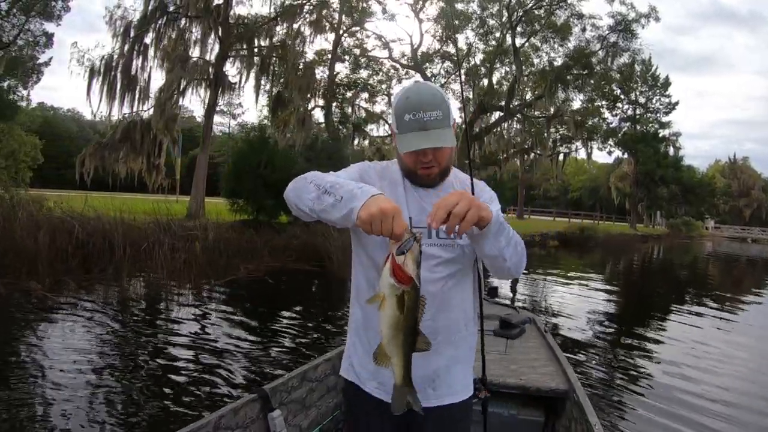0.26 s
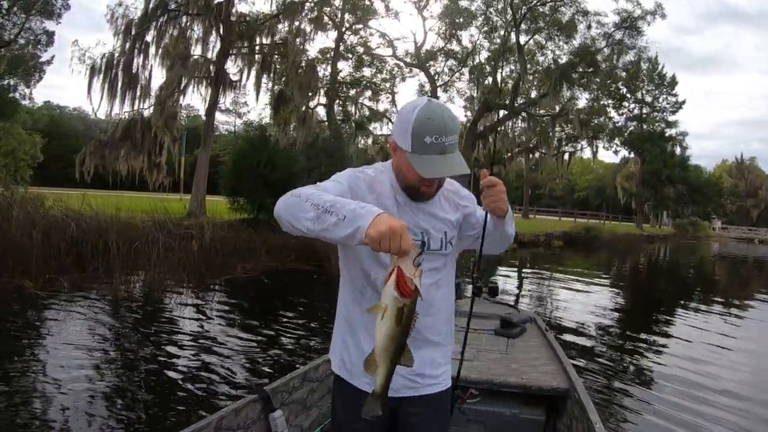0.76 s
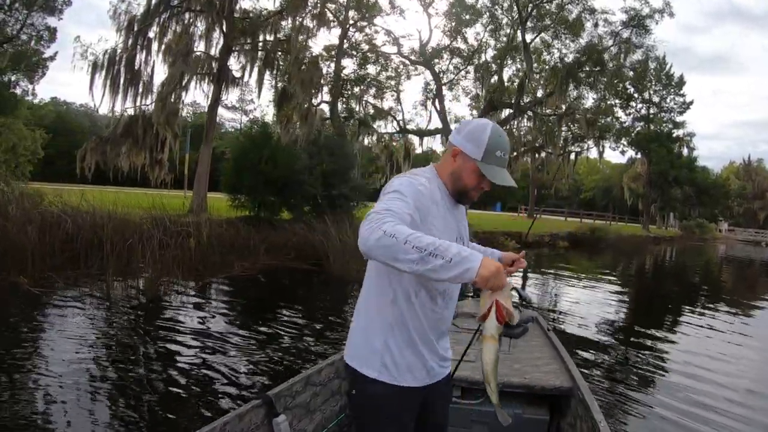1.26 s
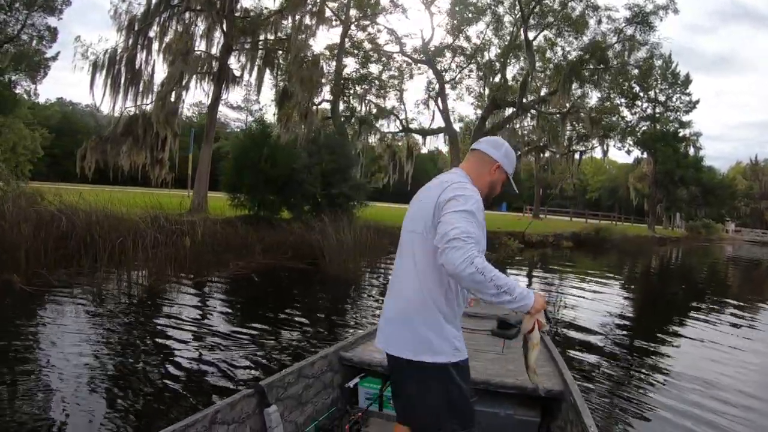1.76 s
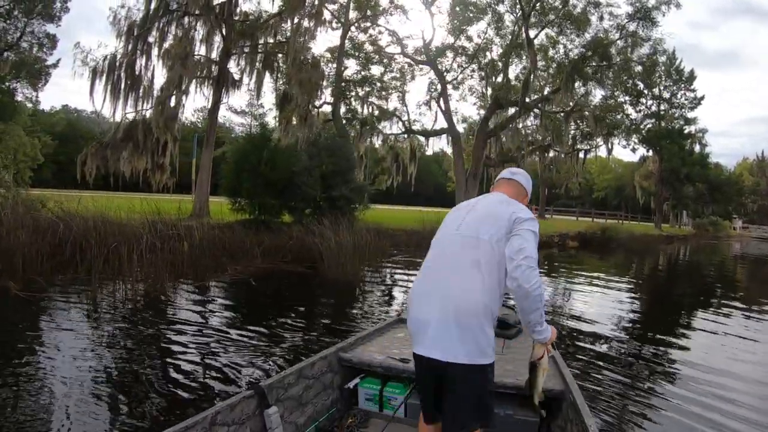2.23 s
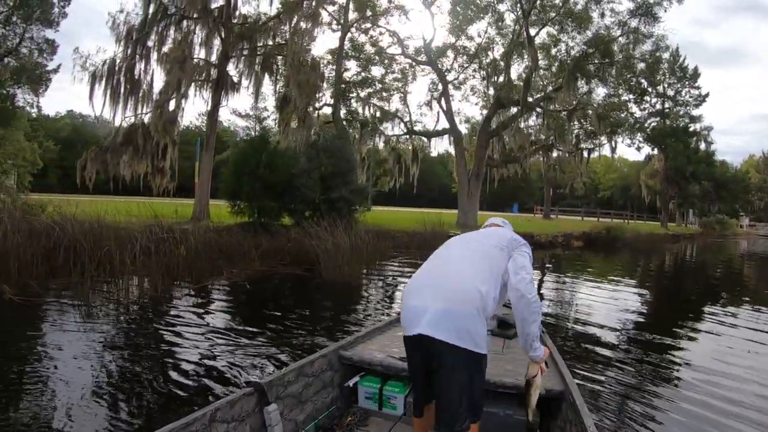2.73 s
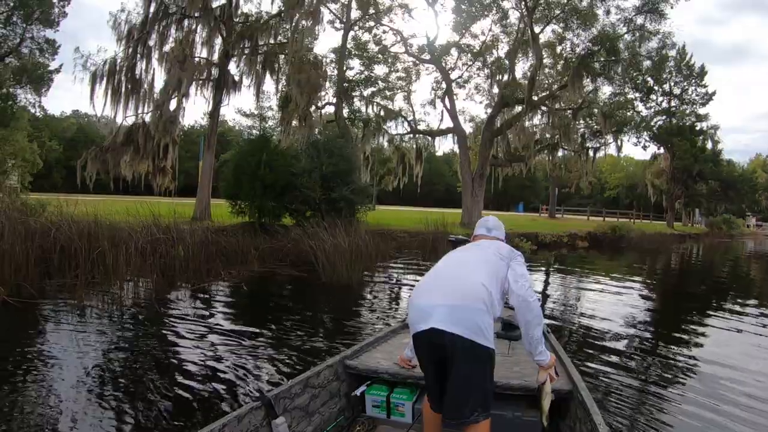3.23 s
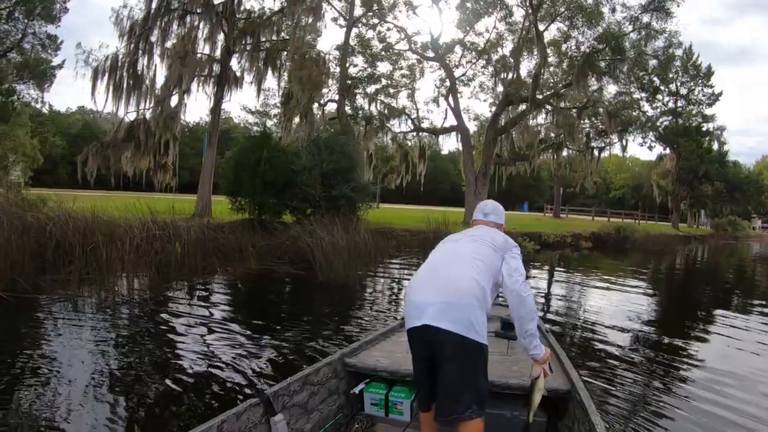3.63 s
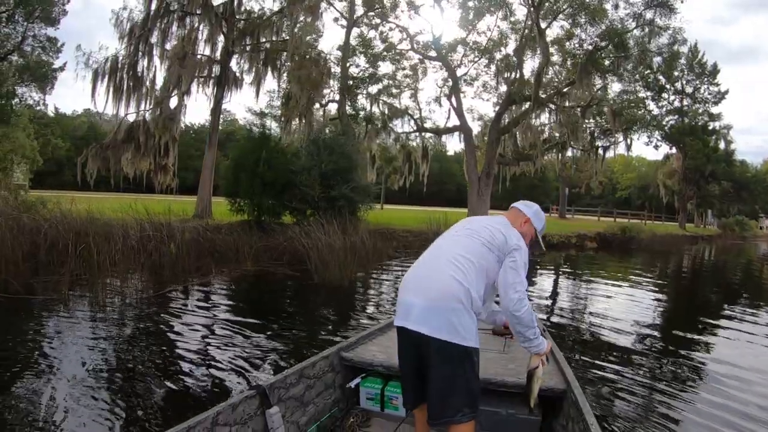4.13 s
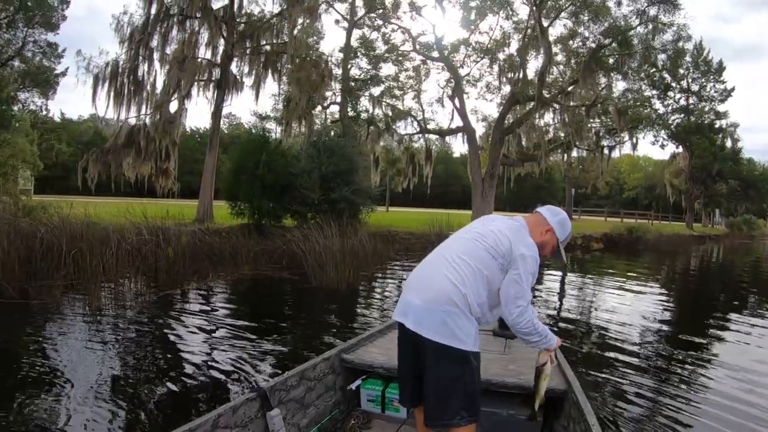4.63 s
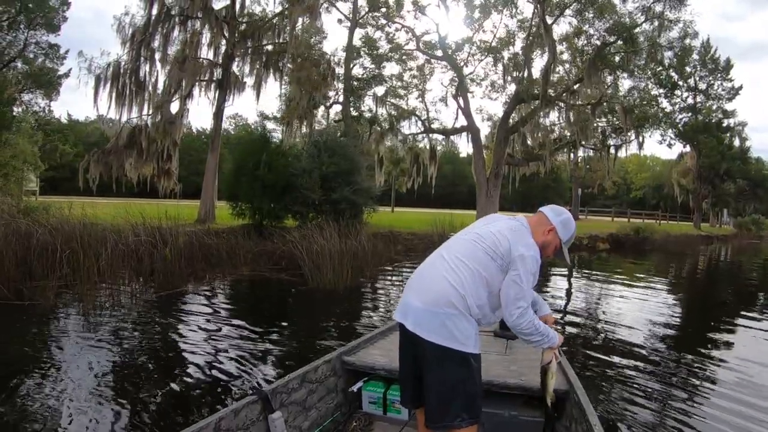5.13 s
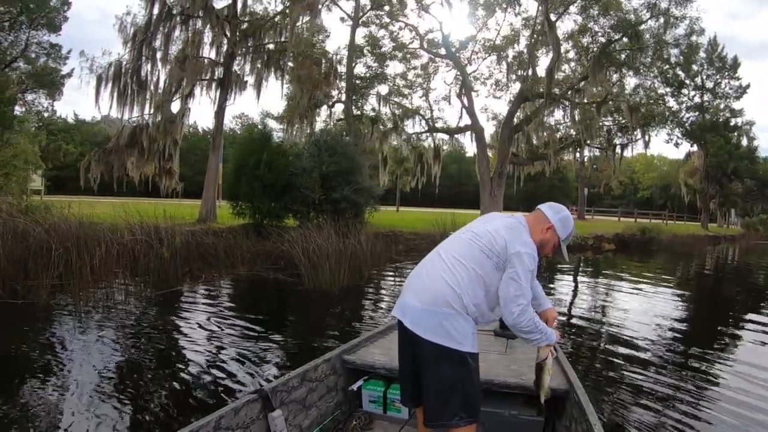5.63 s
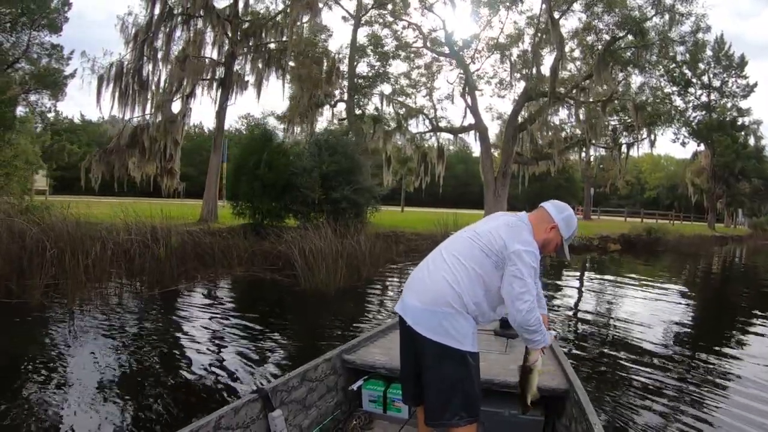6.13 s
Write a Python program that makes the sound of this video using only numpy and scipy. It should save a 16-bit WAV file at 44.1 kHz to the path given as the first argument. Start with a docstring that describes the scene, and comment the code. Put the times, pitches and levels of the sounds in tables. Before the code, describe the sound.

On a small metal boat on a still pond, a soft hollow step and light gear bumps come first, with tiny ticks, cloth rustle and a short rubber squeak. Heavier steps then boom through the deck, the biggest past two seconds. A latch clacks twice and a lid judders and scrapes. Afterwards it is quiet: faint wet crackle, a brief bird whistle and sharp tackle clicks. Close microphone aboard, boat sounds leaning slightly right, open air and faint hum behind.

```python
"""An angler carries a fish across an aluminium boat on a still pond, with a faint hum and insects.
At first a step booms in the hollow deck, gear bumps and a fitting ticks; clothes rub, soles chafe and squeak.
More steps come after a second, then a latch clacks twice and a lid judders and drags against the hull.
The fish is handled with a faint crackle, a bird whistles briefly and tackle clicks at the end.
Struck things are decaying tones plus fading noise; rubbing, air and insects are filtered noise."""
import sys
import numpy as np
from scipy import signal
from scipy.fft import rfft, irfft
from scipy.io import wavfile

SR = 44100
rng = np.random.default_rng(int(sys.argv[2]) if len(sys.argv) > 2 else 0)


def unload_wav(signal):
    """Save mono or channel-first audio to the path in sys.argv[1] as 16-bit WAV at rate SR, clipped to [-1, 1]."""
    wavfile.write(
        sys.argv[1],
        SR,
        np.round(np.clip(np.atleast_2d(signal).T, -1, 1) * 32767).astype(np.int16),
    )


N = 281358
TIME = np.arange(N) / SR
RING_TIME = TIME[:SR]  # one second, the longest that any blow rings
SIDES = np.array([[1], [-1]])  # left and right


def from_db(db):
    """Turn decibels into gain."""
    return 10 ** (np.asarray(db) / 20)


def rms(x):
    """Average strength of a signal (root mean square)."""
    return np.sqrt(np.mean(x ** 2) + 1e-20)


def onset_one(x, size):
    """Scale a ring so that its first samples have rms 1."""
    return x / rms(x[:, :size])


def at_hz(points, hz):
    """Read a table between its rows, on a log-frequency axis."""
    points = np.array(points)
    return np.interp(np.log(hz), np.log(points[:, 0]), points[:, 1])


def cut(x, hz, kind, order=2):
    """Filter away part of the spectrum (Butterworth)."""
    return signal.sosfilt(signal.butter(order, hz, kind, fs=SR, output="sos"), x)


def drift(rate):
    """Smooth random wandering: 'rate' random points a second, joined by straight lines."""
    knots = rng.standard_normal(int(rate * N / SR) + 2)
    return np.interp(TIME * rate, np.arange(len(knots)), knots)


# How alike left and right are. Each row: frequency in Hz, likeness at full focus (1 is identical).
LIKENESS = [(60, .9), (300, .96), (1000, .72), (3000, .85), (8000, .55)]


def noise_bands(length, focus=1):
    """Third-octave bands of stereo noise as (Hz, signal); at focus 0 the sides are unrelated."""
    edges = 24 * 2 ** (np.arange(29) / 3)
    white = rng.standard_normal((2, 2, length + SR // 4))
    for k, (low, high) in enumerate(zip(edges, edges[1:])):
        hz = np.sqrt(low * high)
        mid, side = cut(white[k % 2], [low, high], "band")[:, -length:]
        alike = np.clip(focus * at_hz(LIKENESS, hz), -1, 1)
        yield hz, np.sqrt(1 + alike) * mid + np.sqrt(1 - alike) * side * SIDES


def coloured(spectrum, focus, patchy_db, patchy_rate):
    """Stereo noise of rms 1 whose bands swell and sink each in their own time."""
    out = 0
    for hz, band in noise_bands(N, focus):
        level_db = at_hz(spectrum, hz) + patchy_db * drift(patchy_rate)
        out = out + from_db(level_db) * band
    return out / rms(out)


def narrow_noise(low_hz, high_hz):
    """A wavering band of noise, partly alike in both ears."""
    shared, separate = rng.standard_normal(N), rng.standard_normal((2, N))
    band = cut(shared + 3.6 * separate, [low_hz, high_hz], "band")
    return band / rms(band)


def contact(hz, hardness):
    """A soft contact favours low modes, a hard one higher ones (dB per octave, 100 to 700 Hz)."""
    return from_db(hardness * np.log2(np.clip(hz, 100, 700)))


def dying(hz, t60, bloom):
    """A vibration builds up over 'bloom' cycles, then falls by 60 dB every t60 seconds."""
    return from_db(-60 * RING_TIME / t60) * (1 - np.exp(-RING_TIME * hz / bloom))


def crowd(spectrum, t60s, hardnesses, bloom):
    """For each blow, the ring of countless close modes: noise that dies band by band."""
    hop = SR // 8  # each blow takes a later piece of the noise
    out = np.zeros((len(hardnesses), 2, SR))
    for hz, band in noise_bands(SR + len(hardnesses) * hop):
        fade = from_db(at_hz(spectrum, hz)) * dying(hz, at_hz(t60s, hz), bloom)
        for k, hardness in enumerate(hardnesses):
            out[k] += band[:, k * hop:k * hop + SR] * fade * contact(hz, hardness)
    return out


SNAP_S = 0.002  # how fast the extra sharpness of metal on metal fades


def blows(events, modes, spectrum, t60s, crowd_db, bloom, rise_s, lowest_hz, snap=0):
    """Each blow (start s, body dB, crack dB, hardness) rings clear modes and a crowd: low body, bright crack."""
    out = np.zeros((2, N + SR))
    mode_hz = np.array(modes)[:, 0]
    rings = []
    for k, (hz, db, t60) in enumerate(modes):
        tone = np.sin(2 * np.pi * hz * RING_TIME)
        rings.append((-1) ** k * from_db(db) * dying(hz, t60, bloom) * tone)
    rings = np.array(rings)
    # the spot that is struck decides how strongly each mode answers
    spots = from_db(2 * rng.standard_normal((len(events), len(modes))))
    crowds = crowd(spectrum, t60s, np.array(events)[:, 3], bloom)
    sharpen = 1 + snap * np.exp(-RING_TIME / SNAP_S)
    for (s, body_db, crack_db, hardness), spot, dense in zip(events, spots, crowds):
        clear = (spot * contact(mode_hz, hardness)) @ rings
        ring = onset_one(clear[None], size=1300) + from_db(crowd_db) * onset_one(dense, size=1300)
        ring = cut(ring * np.minimum(RING_TIME / rise_s, 1), lowest_hz, "high")
        body = onset_one(cut(ring, 1000, "low", order=6), size=1300)
        crack = onset_one(cut(ring, 1487, "high", order=6) * sharpen, size=600)
        start = max(int(s * SR), 0)
        out[:, start:start + SR] += from_db(body_db) * body + from_db(crack_db) * crack
    return out[:, :N]


def swell(middle, length):
    """One smooth rise and fall, silent outside its length."""
    return np.cos(np.pi * np.clip((TIME - middle) / length, -.5, .5)) ** 2


def strokes(rows):
    """The pressure of several strokes, each with its own length and strength."""
    return sum(from_db(db) * swell(middle, length) for middle, length, db in rows)


def glides(rows, waver):
    """Short falling tones with an unsteady pitch."""
    out, unsteady = 0, 1 + waver * drift(500)
    for middle, length, db, start_hz, end_hz in rows:
        ends = [middle - length / 2, middle + length / 2]
        pitch = np.interp(TIME, ends, [start_hz, end_hz]) * unsteady
        tone = np.sin(2 * np.pi * np.cumsum(pitch) / SR)
        out = out + from_db(db) * np.sqrt(2) * swell(middle, length) * tone
    return out


# The colour of the open air. Each row: frequency in Hz, level in dB per Hz (only the shape counts).
AIR = [(25, -13.5), (65, -2.5), (113, -25), (134, -2), (206, 0), (245, -10), (358, -8), (483, -20.5),
       (779, -7), (929, -18), (1290, -17.5), (3200, -24), (10100, -33), (13800, -66.5)]
AIR_LEVEL_DB, HUM_DB, INSECTS_DB = -58.5, -61, -82


def pond():
    """Open air as patchy noise, a faint low hum and a thin chorus of insects as narrow bands."""
    air = from_db(AIR_LEVEL_DB) * coloured(AIR, focus=0, patchy_db=1.5, patchy_rate=24)
    hum = from_db(HUM_DB) * narrow_noise(166, 215)
    insects = from_db(INSECTS_DB) * narrow_noise(7400, 7750)
    return air + hum + insects


# The bird's slurred notes. Each row: middle in seconds, length in seconds, level in dB,
# start pitch in Hz, end pitch in Hz.
WHISTLE = [(5.3, .07, -67, 2200, 1645), (5.33, 0.078, -62, 3570, 2944), (5.372, 0.054, -55.5, 3100, 2840),
           (5.412, 0.05, -73, 2290, 1890)]


def bird(echo_db, echo_t60):
    """A thin whistle from the bank that lingers among the trees, an echo made of dying noise."""
    call = glides(WHISTLE, waver=0.0209)
    trees = rng.standard_normal((2, SR)) * from_db(-60 * RING_TIME / echo_t60)
    trees = trees / np.linalg.norm(trees[0])
    return call + from_db(echo_db) * signal.fftconvolve(call[None], trees)[:, :N]


CRACKLE_MIDDLE_S, CRACKLE_LENGTH_S, CRACKLES_PER_S, CRACKLE_DB = 4.226, 1.3, 70, -71


def crackling():
    """The fish is handled: sparse, tiny wet clicks, each ringing a few cycles at one of ten pitches."""
    out, pitches = 0, np.geomspace(800, 6500, 10)
    for hz in pitches:
        chance = CRACKLES_PER_S / len(pitches) / SR
        clicks = (rng.random(N) < chance) * rng.uniform(-1.05, 1, N)
        ringing = signal.lfilter(*signal.iirpeak(hz, 5, fs=SR), clicks + 1e-18)
        out = out + ringing / hz ** .75  # higher clicks are weaker
    return from_db(CRACKLE_DB) * swell(CRACKLE_MIDDLE_S, CRACKLE_LENGTH_S) * out / rms(out)


# A small metal fitting ticking on the rod. Each row: start in seconds, strength in dB.
TICKS = [(0.344, -54.5), (0.364, -50), (0.608, -51), (0.627, -50), (0.635, -40.5), (1.105, -53),
         (1.123, -49.5), (5.314, -61)]
# What the fitting rings with. Each row: frequency in Hz, relative level in dB, time to fall 60 dB in seconds.
TICK_MODES = [(2320, -18, 0.015), (3220, 11.5, 0.0058), (4170, 10.5, 0.0021), (6540, 14.5, 0.0051),
              (8200, 1, 0.0047), (11000, 13, 0.0014)]


def fitting(rattle_t60):
    """A light metal part: each touch chatters briefly and rings a few short, high modes."""
    touches = np.zeros(N + SR)
    for (s, db), chatter in zip(TICKS, rng.standard_normal((len(TICKS), SR))):
        chatter = chatter * from_db(-60 * RING_TIME / rattle_t60)
        start = int(s * SR)
        touches[start:start + SR] += from_db(db) * chatter / np.linalg.norm(chatter)
    ring = 0
    for hz, db, t60 in TICK_MODES:
        ring = ring + from_db(db - 60 * RING_TIME / t60) * np.sin(2 * np.pi * hz * RING_TIME)
    return signal.fftconvolve(touches[None], onset_one(ring[None], size=600))[:, :N]


# Tackle snapping and clacking. Each row: start in seconds, thud level in dB, click level in dB.
CLICKS = [(2.265, -52, -39), (2.424, -54, -52.5), (3.053, -76, -49.5), (3.823, -89, -53),
          (4.103, -68, -59.5), (5.508, -63, -51.5), (5.524, -73, -54.5), (5.946, -52.5, -35.5),
          (6.119, -47, -40.5)]
# Its clear modes. Each row: frequency in Hz, relative level in dB, time to fall 60 dB in seconds.
CLICK_MODES = [(2220, -6, 0.045), (3760, -7.5, 0.049), (7140, -3, 0.011)]
# Its crowd of close modes. Each row: frequency in Hz, relative level in dB per Hz.
CLICK_CROWD = [(240, -42), (400, -7), (538, -20.5), (1370, 3.5), (2190, -5), (3420, 2.5), (4360, -2.5),
               (6460, -4), (10100, -17.5)]
# How that crowd dies. Each row: frequency in Hz, time to fall 60 dB in seconds.
CLICK_T60 = [(600, 0.051), (3000, 0.076), (9000, 0.095)]


def tackle():
    """Each click has its own thud level: some are all click, others also thump what holds them."""
    events = [(s, thud_db, click_db, 0) for s, thud_db, click_db in CLICKS]
    return blows(events, CLICK_MODES, CLICK_CROWD, CLICK_T60,
                 crowd_db=10, bloom=0.3, rise_s=0.00032, lowest_hz=300)


# Rod and gear bumping the boat. Each row: start in seconds, strength in dB.
BUMPS = [(0.062, -46.5), (0.204, -42.5), (0.272, -47), (0.918, -46), (0.998, -42), (1.175, -41.5),
         (1.286, -36), (1.384, -45), (1.441, -43.5), (1.48, -46.5), (1.679, -41), (2.658, -40),
         (3.215, -42.5), (5.837, -43.5)]
# Its clear modes. Each row: frequency in Hz, relative level in dB, time to fall 60 dB in seconds.
BUMP_MODES = [(329, -3.5, 0.052), (456, 8, 0.11), (682, 0, 0.061), (731, 17, 0.079)]
# Its crowd of close modes. Each row: frequency in Hz, relative level in dB per Hz.
BUMP_CROWD = [(88, -68.5), (150, -1.5), (388, -1.5), (1310, -8), (1800, -19), (3630, -25), (10100, -37.5)]
# How that crowd dies. Each row: frequency in Hz, time to fall 60 dB in seconds.
BUMP_T60 = [(250, 0.26), (1000, 0.16)]
# body and crack against the strength in dB, hardness in dB per octave
BUMP_BODY_DB, BUMP_CRACK_DB, BUMP_HARDNESS = -4, -11, -2


def gear_bumps():
    """The same light contact each time, differing in strength and in the spot that is struck."""
    events = [(s, db + BUMP_BODY_DB, db + BUMP_CRACK_DB, BUMP_HARDNESS) for s, db in BUMPS]
    return blows(events, BUMP_MODES, BUMP_CROWD, BUMP_T60,
                 crowd_db=11.5, bloom=0.22, rise_s=0.00032, lowest_hz=145.0)


# The colour of cloth and soles rubbing. Each row: frequency in Hz, level in dB per Hz (only the shape counts).
CLOTH = [(290, -17), (500, -4), (949, -4), (1460, 0.5), (2500, 2), (3600, -1.5), (8670, -10.5),
         (10100, -31), (13800, -73)]
# Single light brushes of a sleeve or sole. Each row: middle in seconds, length in seconds, level in dB.
BRUSHES = [(0.451, 0.075, -55), (0.665, 0.072, -55.5), (1.24, 0.09, -55), (1.31, 0.095, -43),
           (2.645, 0.064, -51.5), (4.34, 0.47, -64), (5.979, 0.21, -61.5)]
# The angler takes the rod, turns and steps forward. Each row: the Hz above which it is dull at full speed,
# then a list of points, each a time in seconds and a rubbing level in dB.
MOVES = [ (9800, [(0.6, -55.5), (0.655, -56), (0.72, -54), (0.77, -49.5), (0.835, -45.5), (0.9, -64.5)]),
         (6000, [(1.35, -59), (1.45, -59), (1.485, -48), (1.55, -50.5), (1.59, -56.5)]),
         (4680, [(2.115, -62), (2.154, -41), (2.18, -49), (2.235, -41), (2.268, -40), (2.305, -42.5),
         (2.33, -58)]), ]
SLOW_RUB_HZ = 2610  # slow rubbing is dull above this


def rubbing(catch_db):
    """Cloth and soles slip in tiny grains and catch now and then; each move brightens as it speeds up."""
    cloth = coloured(CLOTH, focus=.6, patchy_db=3, patchy_rate=110)
    grains = cloth * from_db(catch_db * drift(84))
    slow = cut(grains, SLOW_RUB_HZ, "low", order=1)
    slow = slow / rms(slow)
    out = slow * strokes(BRUSHES)
    for fast_hz, move in MOVES:
        fast = cut(grains, fast_hz, "low", order=1)
        fast = fast / rms(fast)
        s, db = np.transpose(move)
        level = from_db(np.interp(TIME, s, db)) * (TIME >= s[0]) * (TIME <= s[-1])
        speed = np.sqrt(level / level.max())  # a louder rub counts as a faster one
        out = out + level * (speed * fast + (1 - speed) * slow)
    return out


# Soles chafing as they twist on the deck. Each row: middle in seconds, length in seconds, level in dB.
CHAFES = [(1.232, 0.048, -50), (1.415, 0.072, -48), (1.606, 0.08, -50.5), (2.215, 0.03, -44)]
CHAFE_LOW_HZ, CHAFE_HIGH_HZ = 1550, 2560


def chafing():
    """Twisting rubber slips unevenly and rasps in one narrow band of noise."""
    rasp = cut(rng.standard_normal(N), [CHAFE_LOW_HZ, CHAFE_HIGH_HZ], "band")
    return strokes(CHAFES) * rasp / rms(rasp)


# how often grains come, how long they last, how strong they are against the smooth rub
GRAINS_PER_S, GRAIN_S, GRIT_DB = 550, 0.0008, 1


def grit(rub):
    """Coarse grains snap loose under a rub, each a tiny burst of its own size."""
    sizes = from_db(4 * np.minimum(rng.exponential(1, N), 3))
    snaps = (rng.random(N) < GRAINS_PER_S / SR) * sizes
    bursts = signal.lfilter([1], [1, -np.exp(-1 / (GRAIN_S * SR))], snaps + 1e-18)
    gain = 1 + from_db(GRIT_DB) * bursts / rms(bursts)
    return rub * gain / rms(gain)


# Rubber squeaking. Each row: middle in seconds, length in seconds, level in dB,
# start pitch in Hz, end pitch in Hz.
SQUEAKS = [(.779, 0.039, -43, 1850, 1540), (6.061, 0.031, -64.5, 5270, 3850)]


def squeaks():
    """Rubber squeaks as short falling tones whose pitch trembles."""
    return glides(SQUEAKS, waver=0.098)


# The lid's clear modes. Each row: frequency in Hz, relative level in dB, time to fall 60 dB in seconds.
LID_MODES = [(203, 0, .3), (252, -6, .52), (337, -7, .48), (382, -7, .25), (482, -1.5, .26),
             (510, -10, .25), (554, -5, .22), (582, -4, .2), (638, -5.5, .39), (728, -3, .2),
             (886, -7, .17), (921, -1.5, .16), (958, -6.5, .15), (991, -4, .16), (1705, -9, .12),
             (1860, -14, .09), (2750, -11, .08), (3230, -8, .07)]
# Its crowd of close modes. Each row: frequency in Hz, relative level in dB per Hz.
LID_CROWD = [(59, -33), (100, -19.5), (139, -27.5), (190, 4), (312, -2.5), (434, -3.5), (520, -0.5),
             (700, -3.5), (800, -5), (1000, 9.5), (1250, -15), (1800, -5), (3170, -7), (4750, -16.5),
             (10100, -56)]
# How that crowd dies. Each row: frequency in Hz, time to fall 60 dB in seconds.
LID_T60 = [(250, 0.63), (900, 0.19), (2000, 0.13), (7000, 0.026)]
# The lid dragging between its knocks. Each row: middle in seconds, length in seconds, level in dB.
DRAGS = [(3.372, 0.12, -27), (3.484, 0.048, -28.5)]


def dragging(slips_per_s, rasp_db):
    """The lid's edge sticks and slips, and every slip sets the lid ringing."""
    ring = blows([(0, 0.0057, rasp_db, 0.002)], LID_MODES, LID_CROWD, LID_T60,
                 crowd_db=-5.5, bloom=0.36, rise_s=.001, lowest_hz=201)
    ring = ring[:, :SR] / np.linalg.norm(ring[0, :SR])
    slips = (rng.random(N) < slips_per_s / SR) * rng.choice([-1, 1], N)
    pushes = slips / rms(slips) * strokes(DRAGS)
    return signal.fftconvolve(pushes[None], ring)[:, :N]


# The lid knocking as it judders shut. Each row: start in seconds, body level in dB, crack level in dB,
# hardness in dB per octave.
LID = [(3.2686, -21.5, -30.5, 0.5), (3.372, -32.5, -40, 4), (3.418, -25.5, -32.5, 3), (3.46, -24, -31, 2.5),
       (3.528, -22, -22, 2.5)]
# after each knock the lid falls back once, softly: delay, then levels against the knock
REBOUND_S, REBOUND_BODY_DB, REBOUND_CRACK_DB = 0.0158, -6, -20.5


def lid_judder():
    """Each knock rings the lid and is followed by a dull rebound."""
    rebounds = [(s + REBOUND_S, body_db + REBOUND_BODY_DB, crack_db + REBOUND_CRACK_DB, hardness)
                for s, body_db, crack_db, hardness in LID]
    return blows(LID + rebounds, LID_MODES, LID_CROWD, LID_T60,
                 crowd_db=-4.5, bloom=0.8, rise_s=0.0031, lowest_hz=140)


# The latch snapping. Each row: start in seconds, body level in dB, crack level in dB, hardness in dB per octave.
LATCH = [(2.9225, -27, -21, -2), (2.999, -25.5, -23.5, -3)]
# Its clear modes. Each row: frequency in Hz, relative level in dB, time to fall 60 dB in seconds.
LATCH_MODES = [(94, -4, .65), (107, -2, .45), (193, 3, .5), (285, -13, .5), (371, -15, .4), (458, -14, .3),
               (732, -4, .28), (921, 7, .22), (975, 3.5, .16), (1513, 9, .09), (2060, 6, .07),
               (2670, 5, .07), (2977, 7, .08), (3213, 9, .085), (3525, 4, .07), (3670, 3, .07),
               (4660, -1, .06)]
# Its crowd of close modes. Each row: frequency in Hz, relative level in dB per Hz.
LATCH_CROWD = [(35, -36), (60, -20.5), (107, -9.5), (258, -23.5), (621, -20.5), (803, -22), (933, -25),
               (1260, -7.5), (1560, -17), (3170, -12), (5500, -24.5), (10100, -46.5)]
# How that crowd dies. Each row: frequency in Hz, time to fall 60 dB in seconds.
LATCH_T60 = [(150, 0.6), (800, 0.22), (3000, 0.076), (9000, 0.081)]


def latch_clacks():
    """Metal meets metal: two ringing clacks whose crack is sharpest in its first instant."""
    return blows(LATCH, LATCH_MODES, LATCH_CROWD, LATCH_T60,
                 crowd_db=1.5, bloom=0.99, rise_s=.0001, lowest_hz=69.7, snap=1.0)


# The hollow under the deck taking the weight. Each row: start in seconds, level in dB,
# swell time in seconds, hold time in seconds.
BOOMS = [(0.0, -35.5, 0.0023, .03), (1.306, -32.5, 0.033, 0.12), (2.238, -28, 0.014, 0.009),
         (2.362, -23, 0.052, 0.058), (2.617, -20.5, 0.032, 0.055)]
BOOM_HZ, BOOM_SAG_DB_PER_S = 112.65, 81.5


def hollow(release_t60):
    """The air under the deck booms on one low note: it swells, sags through its hold, then dies faster."""
    out = 0
    for s, db, swell_s, hold_s in BOOMS:
        age = np.maximum(TIME - s, 0)
        attack = np.sin(np.pi / 2 * np.minimum(age / swell_s, 1)) ** 2
        sag_db = BOOM_SAG_DB_PER_S * np.maximum(age - swell_s, 0)
        release_db = 60 * np.maximum(age - swell_s - hold_s, 0) / release_t60
        out = out + attack * from_db(db - sag_db - release_db) * np.sin(2 * np.pi * BOOM_HZ * age)
    return out


# Footfalls, heel first and then the sole. Each row: start in seconds, heel strength in dB,
# roll from heel to sole in seconds, sole strength in dB, heel hardness in dB per octave,
# note of the panel underfoot in Hz.
STEPS = [(0.001, -40, 0.027, -39, -4.5, 121), (1.324, -23.5, 0.06, -32.5, 1, 144.3),
         (2.114, -29.5, 0.033, -21, 1, 203), (2.209, -30.5, 0.042, -32.5, 0.5, 131),
         (2.3602, -13, 0.056, -35, -3.5, 215), (2.572, -30, 0.078, -26.5, -1.5, 204.7)]
# The deck's clear modes. Each row: frequency in Hz, relative level in dB, time to fall 60 dB in seconds.
DECK_MODES = [(133.6, -10.5, 0.2), (157, -10.5, 0.2), (291, -13.5, 0.45), (336.6, -6.5, 0.24),
              (402.2, -11, 0.31), (430, -3, 0.1), (537, -11, 0.1), (725, -15, 0.18)]
# Its crowd of close modes. Each row: frequency in Hz, relative level in dB per Hz.
DECK_CROWD = [(30, -40), (86, -15), (135, -10), (269, -5.5), (421, -12), (700, -20.5), (1040, -19.5),
              (2380, -40), (5320, -42.5), (10100, -77)]
# How that crowd dies. Each row: frequency in Hz, time to fall 60 dB in seconds.
DECK_T60 = [(80, 0.69), (300, 0.35), (1000, 0.18), (4000, 0.024)]
# against the strength: the padded heel is dull, the flat sole slaps
HEEL_CRACK_DB, SOLE_CRACK_DB = -30.5, -18.5
# the sole presses a wider patch and favours low modes: added to the heel's hardness, dB per octave
SOLE_HARDNESS = -3.1
# the panel's own note and the deck's body, against the strength of the footfall
PANEL_DB, PANEL_T60_S, DECK_DB = 5.5, 0.17, -4.5


def footfalls():
    """Each foot lands on its heel and rolls onto the sole: the panel sounds its note, the deck answers."""
    heels = [(s, db, HEEL_CRACK_DB, hardness, hz) for s, db, _, _, hardness, hz in STEPS]
    soles = [(s + roll_s, db, SOLE_CRACK_DB, hardness + SOLE_HARDNESS, hz)
             for s, _, roll_s, db, hardness, hz in STEPS]
    panels = np.zeros(N + SR)
    for s, db, _, _, hz in heels + soles:
        start = max(int(s * SR), 0)
        note = dying(hz, PANEL_T60_S, bloom=0.41) * np.sin(2 * np.pi * hz * RING_TIME)
        panels[start:start + SR] += from_db(db + PANEL_DB) * note
    events = [(s, db + DECK_DB, db + crack_db, hardness) for s, db, crack_db, hardness, _ in heels + soles]
    deck = blows(events, DECK_MODES, DECK_CROWD, DECK_T60,
                 crowd_db=1.5, bloom=0.19, rise_s=0.0013, lowest_hz=62)
    return panels[:N] + deck


# How much louder the left side is. Each row: frequency in Hz, left minus right in dB.
LEAN = [(100, -5.5), (200, 1.5), (400, -0.5), (700, -5.5), (1200, -7.5), (3000, -4), (9000, -4.5)]
# How far the left side runs ahead. Each row: frequency in Hz, left lead in radians.
LEAD = [(100, -.1), (650, -.3), (1000, .4), (1800, .5), (3500, .25), (7000, -.9)]


def place_left_right(x):
    """Level and phase differences between the ears, set by frequency, place the boat's sounds."""
    hz = np.maximum(np.fft.rfftfreq(N + SR, 1 / SR), 1)
    level = from_db(SIDES * at_hz(LEAN, hz) / 2)
    phase = np.exp(.5j * SIDES * at_hz(LEAD, hz))
    return irfft(rfft(x, N + SR) * level * phase, N + SR)[:, :N]


def scene():
    """Everything on the boat, over the bird and the pond."""
    friction = grit(rubbing(catch_db=0.5) + chafing()) + squeaks()
    gear = crackling() + fitting(rattle_t60=0.063) + tackle() + gear_bumps()
    hatch = dragging(slips_per_s=440, rasp_db=-9.5) + lid_judder() + latch_clacks()
    steps = hollow(release_t60=0.25) + footfalls()
    boat = friction + gear + hatch + steps
    return pond() + bird(echo_db=-1.0, echo_t60=1.1) + place_left_right(boat)


def record(dry):
    """The treble is softened above 9600 Hz and cut off steeply at 15000 Hz."""
    soft = cut(dry, 9600, "low", order=5)
    return signal.sosfilt(signal.ellip(10, .1, 80, 15000, fs=SR, output="sos"), soft)


dry = scene()
out = record(dry)
unload_wav(out)
```